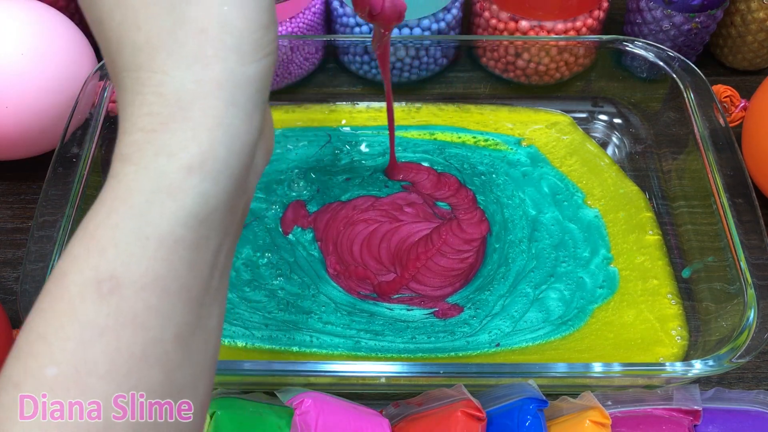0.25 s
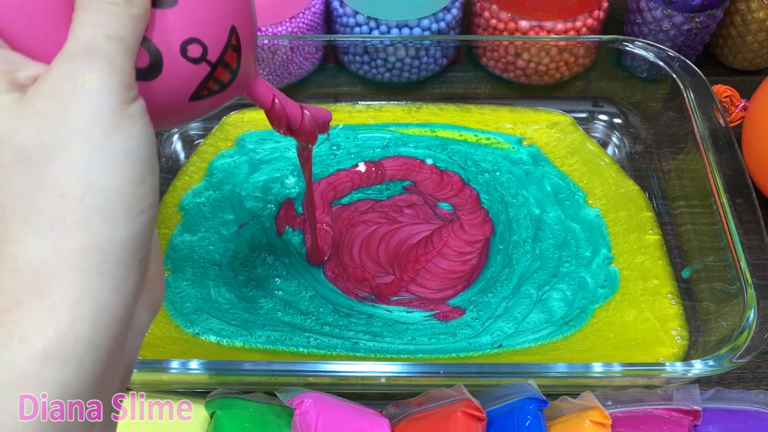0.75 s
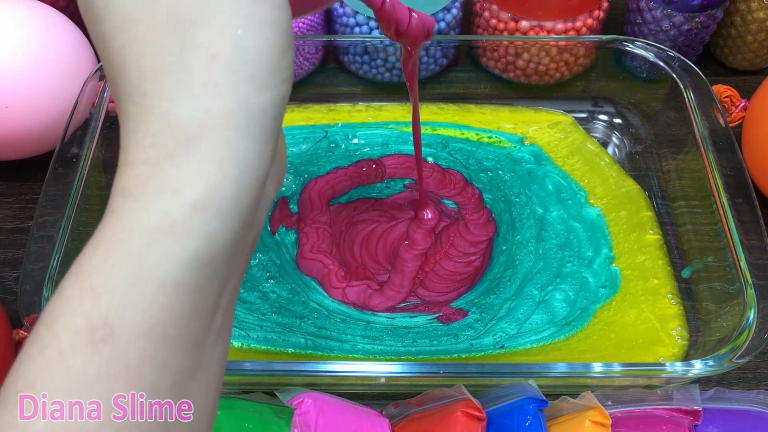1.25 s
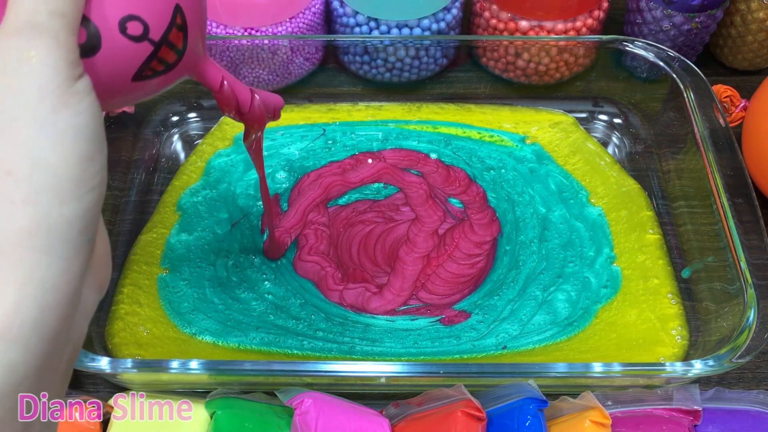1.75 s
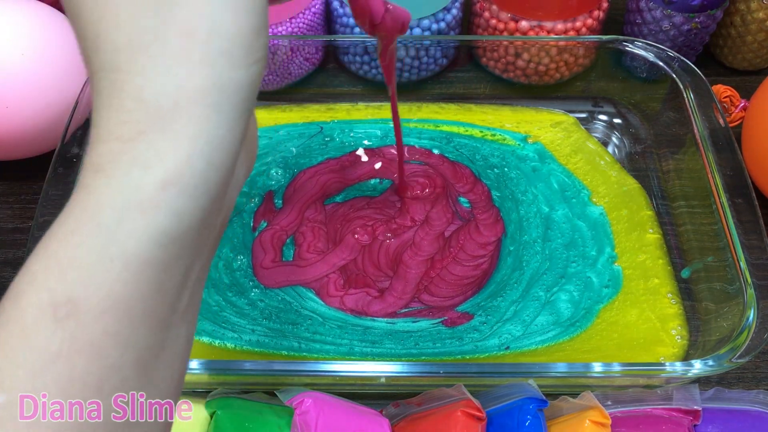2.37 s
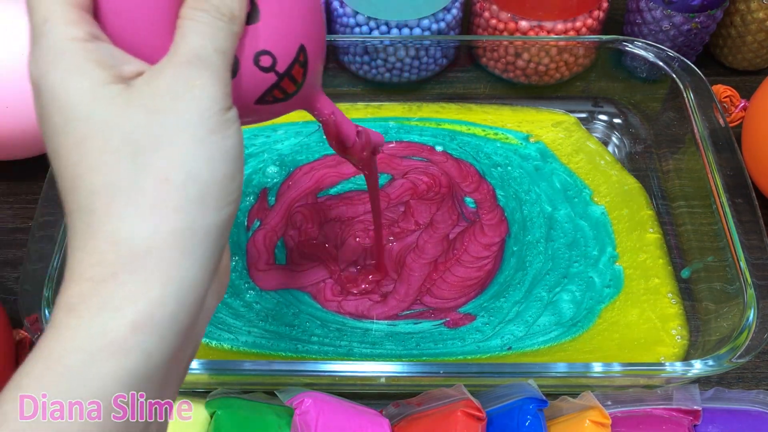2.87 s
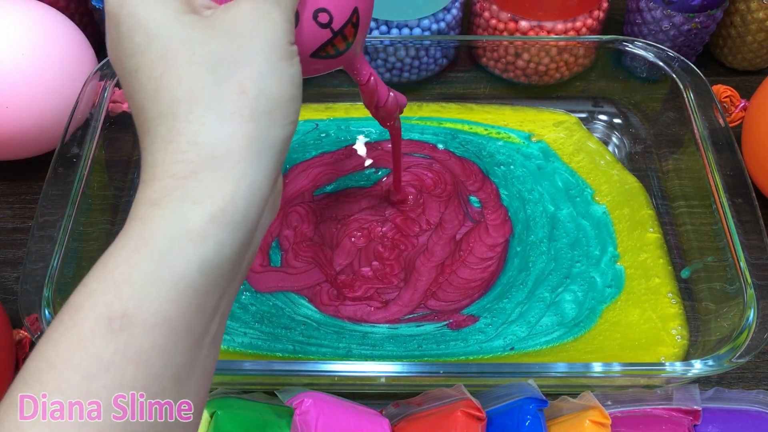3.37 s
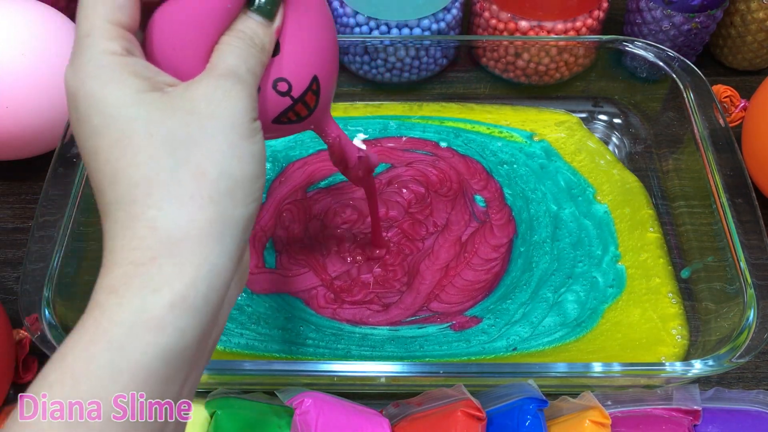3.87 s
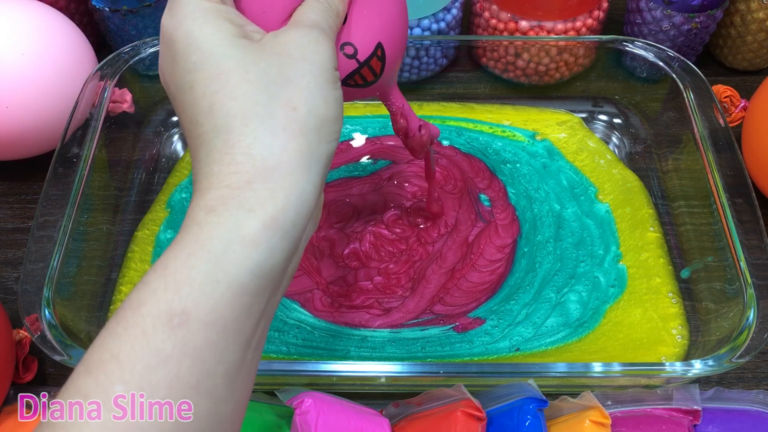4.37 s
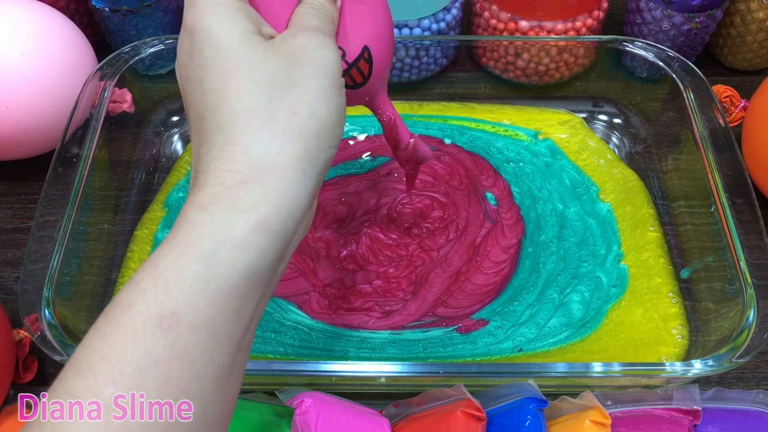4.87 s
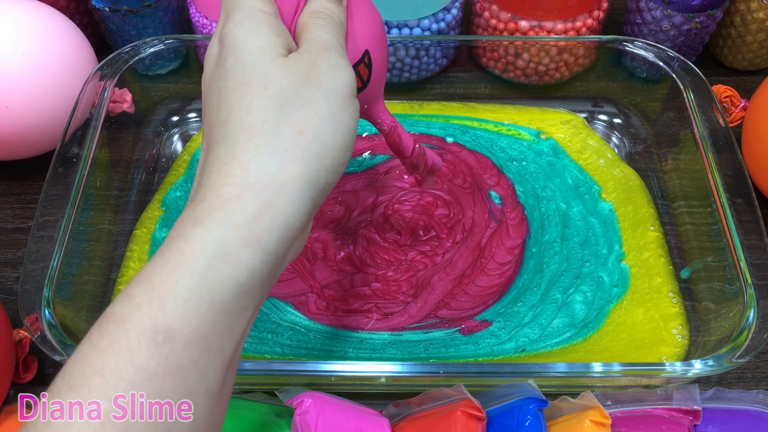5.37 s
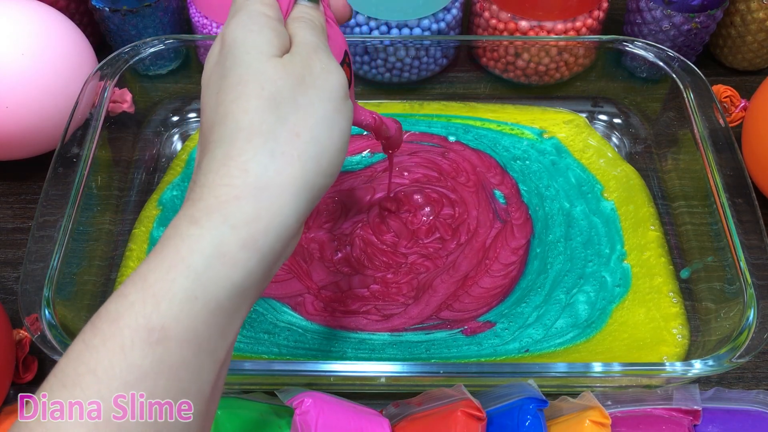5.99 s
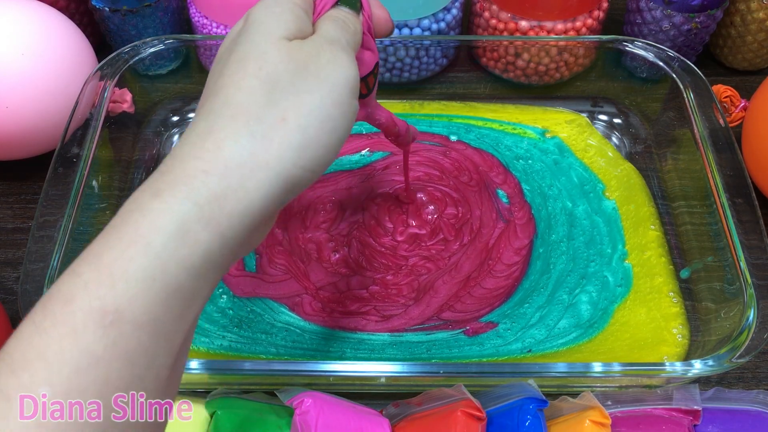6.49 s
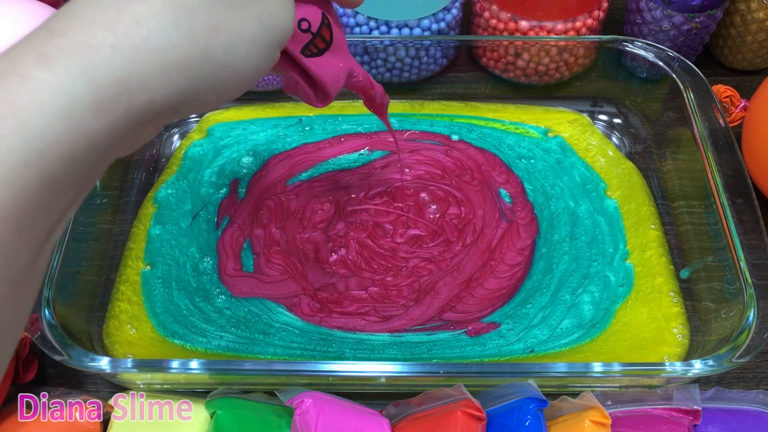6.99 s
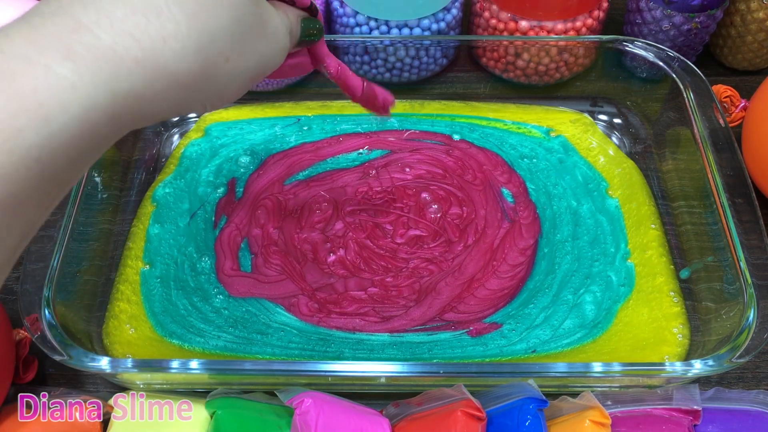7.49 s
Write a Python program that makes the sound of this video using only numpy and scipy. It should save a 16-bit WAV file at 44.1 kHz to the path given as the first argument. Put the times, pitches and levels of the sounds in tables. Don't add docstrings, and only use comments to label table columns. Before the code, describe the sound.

A nearly silent small room with very soft finger rubs on stretched rubber. A hard object clacks sharply at one second. Then air sputters through thick wet slime in a balloon neck: small ticking pops gather into a loud, fluttering, raspy squelch, pause, return in a second long splutter, and finish with a short burst of crackly dregs and stray faint ticks. Close microphone, bright and crisp, short room tail.

```python
import sys
import numpy as np
from scipy import signal
from scipy.fft import rfft, irfft
from scipy.io import wavfile

SR = 44100
rng = np.random.default_rng(int(sys.argv[2]) if len(sys.argv) > 2 else 0)


def rack_gain(trim_db):
    fader = np.asarray(trim_db, float)
    return 10 ** (fader / 20)


def waveform_to_disk(signal):
    frames = np.transpose(np.atleast_2d(signal))
    scaled = np.clip(frames, -1, 1) * 32767
    samples = np.round(scaled).astype(np.int16)
    wavfile.write(sys.argv[1], SR, samples)


N = 341268

# [f/Hz, level/dB per Hz]
AIR_SPECTRUM = [(15, -40), (25, -28), (43, 0), (92, -0.5), (172, -16), (422, -24), (584, -29.5),
                (766, -29.5), (1220, -34.5), (1880, -35.5), (15200, -42), (16500, -51.5)]
# [f/Hz, level/dB]
HUM_LINES = [(780.6, -81.5), (1943, -85.5)]
# [t/s, rise/dB]
RUMBLE_SWELLS = [(.17, 4), (2.952, 8), (3.85, 12.5), (5.3, 4), (5.95, 6), (6.5, 10.5), (6.699, 3), (7.0, 6),
                 (7.38, 4)]
AIR_DB, RUMBLE_DB, SWELL_S = -65, -64, 0.13

# [t/s, length/s, level/dB, slip colour f/Hz, share of the skin's ring]
FINGER_RUBS = [
    (.02, .004, -62, 2000, .2),
    (.143, .012, -66, 1900, .9),
    (.157, .006, -55, 2800, .9),
    (.17, .015, -60, 1000, .9),
    (.224, .01, -61, 2000, .9),
    (.24, .012, -61, 1000, .9),
    (.385, .018, -59, 1900, .9),
    (.791, .007, -49, 1650, .03),
]
# [f/Hz, width/Hz, level/dB]
SKIN_MODES = [(990, 130, 11), (1880, 115, 14.5), (2410, 88, 5.5), (2710, 100, 11), (3800, 200, -9)]

# [t/s, level/dB, hardness f/Hz]
CLACK_CONTACTS = [
    (1.0278, -36, 2400),
    (1.0312, -40, 5000),
    (1.0368, -30, 2800),
    (1.0411, -21, 16000),
    (1.0421, -14.5, 16000),
    (1.0469, -16.5, 10000),
    (1.0529, -19, 8500),
    (1.0578, -19, 8500),
]
# [f/Hz, level/dB, t60/s]
CLACK_RING = [(165, -27, .12), (230, -23, .05), (340, -27, .04), (800, -10, .008), (1600, -3, .006),
              (2400, -2, .009), (3300, -1, .007), (4500, 2, .007), (5900, -20, .11), (7700, -16, .02),
              (11600, -17, .07), (12100, -4, .006), (13100, -15, .06)]
# [low f/Hz, high f/Hz, level/dB, t60/s]
CLACK_BODY = [(148, 400, -42, 0.19), (2180, 3650, -32.5, 0.24), (3500, 3800, -50, .2),
              (9000, 13500, -35, 0.11)]
CLACK_DB = 6.5

# [t/s, time to the snap/ms, snap level/dB, plop level/dB]
FIRST_PUFFS = [(1.97, 1.1, -53, -61), (2.0023, 1.5, -42, -48), (2.0404, 0.75, -37.5, -42.5),
               (2.086, 1.8, -37, -47), (2.1053, .7, -37.5, -43), (2.1314, 7.5, -45, -40),
               (2.1663, 0.22, -35.5, -38), (2.1858, 0.29, -39, -41), (2.2251, 0.6, -35, -58),
               (2.2474, 0.51, -36.5, -39), (2.2627, 1.1, -32, -36.5), (2.2822, 0.79, -36, -49),
               (2.2986, 2.1, -35.5, -45), (2.3182, 0.8, -35.5, -29), (2.3495, 3, -33.5, -62),
               (2.3721, 0.27, -36, -50), (2.3915, 0.76, -32.5, -23.5), (2.4035, 3.2, -30.5, -30),
               (2.4381, 1, -32, -36), (2.4528, 0.62, -37, -35.5), (2.4625, 1.6, -27, -62),
               (2.5002, 0.51, -42, -40.5), (2.5183, 0.22, -33, -64), (2.5473, 0.87, -38.5, -53),
               (2.5787, 0.25, -36, -43), (2.6022, 0.22, -29.5, -26), (2.624, 7.8, -43.5, -62),
               (2.6385, 3.2, -28.5, -27), (3.166, 0.87, -55, -46), (3.1895, 0.77, -35.5, -69)]
SECOND_PUFFS = [(3.638, 2.1, -52, -78), (3.6538, 2.8, -35.5, -79), (4.1192, 0.48, -27.5, -38),
                (4.141, 3.3, -22, -32), (4.1696, 6, -30, -63), (4.1971, 0.26, -26.5, -36.5),
                (4.226, 1.8, -28, -59), (4.2472, 2.6, -29.5, -74), (4.2556, 1.5, -51.5, -36),
                (4.2771, 5.6, -27.5, -48), (4.3097, 4.7, -28.5, -30), (4.3392, 3.8, -26.5, -37),
                (4.3653, 5.1, -26.5, -29), (4.394, 2.9, -21, -29), (4.4218, 2.4, -22.5, -29),
                (4.445, 6.9, -25, -24), (4.455, 0.37, -22, -62), (4.4696, 8.6, -23, -27),
                (4.495, 4.7, -21.5, -26), (4.52, 7.4, -25, -28), (4.528, 2.5, -28, -55),
                (4.542, 0.79, -40, -50), (4.5521, 1.6, -23, -31), (4.5746, 3.1, -21, -26),
                (4.611, 8.2, -25, -27.5), (4.628, 7.7, -36, -40), (4.65, 2.45, -27, -30.5),
                (4.6856, 14.6, -36, -36), (4.7, 0.75, -23, -28.5), (4.7343, 10, -33, -43.5)]
DREGS_PUFFS = [(5.5872, 21.3, -43, -31.5), (5.609, 1.35, -20.5, -56), (5.6118, 2.3, -26.5, -57),
               (5.633, 3.6, -26.5, -32), (5.643, 6.5, -26, -50), (5.6773, 6.7, -32.5, -28),
               (5.6883, 13.6, -29.5, -49), (5.719, 7.2, -25.5, -60), (5.7298, .6, -35, -39),
               (5.746, 8.5, -31, -55), (5.757, 8.5, -33, -61), (5.797, 10, -42.5, -66),
               (5.835, 9, -30, -42.5), (5.906, 2.6, -34, -33), (5.9155, 3.9, -31.5, -32.5)]
LONE_PUFFS = [(2.02, 1.0, -49, -77), (3.152, 0.37, -40, -65), (4.789, 2.8, -47, -63),
              (4.795, 1.7, -32, -68), (4.856, 0.7, -29.5, -53), (4.9153, 2, -51, -37),
              (4.943, 1.1, -36, -41), (5.041, 1.44, -40, -48.5), (5.143, 7.1, -43, -41),
              (5.158, 5.6, -45.5, -72), (5.3, 4.7, -54.5, -51), (5.959, 5.2, -42, -72),
              (5.9743, 2.3, -38.5, -70), (6.017, 5.5, -34.5, -67), (6.0588, 1.9, -43.5, -67),
              (6.07, 1.6, -39.5, -48.5), (6.114, 3.36, -34, -50), (6.154, 8, -41.5, -51),
              (6.2025, 6.9, -43.5, -62), (6.26, 1.6, -42.5, -79), (6.5006, 9.3, -56, -50.5),
              (6.9057, 1.7, -52, -62), (6.9846, 1.1, -55.5, -60), (7.6326, .4, -50.5, -57.5),
              (7.6898, .6, -57, -59)]
FIRST_FLUTTER_PUFFS = [(2.65, 0.45, -29, -37), (2.6632, 0.53, -30.5, -36), (2.6764, 0.41, -22.5, -26),
                       (2.6908, 1.1, -27, -41.5), (2.6959, 0.33, -28, -19.5), (2.71, 4.7, -20, -24.5),
                       (2.7266, 1.1, -21, -20.5), (2.7387, 3.14, -18, -15), (2.7554, 1, -15.5, -23.5),
                       (2.767, 0.74, -24.5, -15.5), (2.7795, 1.05, -22.5, -22), (2.7907, 3.8, -23, -16),
                       (2.802, 5.8, -11, -24.5), (2.8138, 4.6, -18, -23.5), (2.8291, 5.7, -20, -18.5),
                       (2.8435, 5.6, -20, -24.5), (2.8577, 5.6, -18, -20.5), (2.8682, 8.9, -21, -26),
                       (2.887, 5.9, -25, -30), (2.8992, 6.3, -20.5, -34), (2.9135, 5, -18.5, -22.5),
                       (2.9286, 4.7, -20.5, -46), (2.942, 4.4, -20.0, -25.5), (2.956, 4.3, -19, -26.5),
                       (2.972, 0.7, -23, -23), (2.9838, 4.0, -17, -30.5), (3.0025, 8.9, -42, -34),
                       (3.0179, 6.6, -21, -30), (3.038, 2.92, -19.5, -29), (3.0605, 1.54, -20.5, -26),
                       (3.0779, 4.4, -24.5, -45), (3.1033, 4.2, -26, -33), (3.1228, 0.6, -28.5, -35),
                       (3.1267, 0.5, -40, -48), (3.1393, 0.66, -34, -48)]
SECOND_FLUTTER_PUFFS = [(3.6786, 0.53, -25, -25), (3.6932, 3.9, -31, -36), (3.708, 0.38, -29, -66),
                        (3.713, 0.64, -33.0, -23.5), (3.7296, 2, -23.5, -21.5), (3.7447, 0.3, -31, -24),
                        (3.761, 1.8, -25, -24), (3.7744, 3.2, -27.0, -20), (3.7902, 1.05, -20.5, -22),
                        (3.8057, 3, -16.5, -22.5), (3.8216, 6.1, -21.5, -27.0), (3.8377, 7.3, -17, -22),
                        (3.8529, 8.6, -23, -30), (3.87, 6.4, -21, -27), (3.8857, 7.6, -23, -32),
                        (3.9008, 7.2, -21.0, -30.5), (3.92, 5.6, -25.5, -32), (3.9338, 6.3, -23.5, -37),
                        (3.9542, 4, -23.0, -40), (3.971, 5.6, -22.0, -26.5), (3.9893, 5.9, -23.5, -32.5),
                        (4.0115, 0.64, -25.5, -31.5), (4.031, 5.7, -25.5, -32.5), (4.0502, 5.8, -30, -33),
                        (4.0731, 2.9, -26, -35), (4.0961, 1.7, -26.5, -33.5)]
FILM_SPITS = [(2.071, 1.26, -36.5, -48), (2.119, 1, -43, -54), (2.137, 1, -38, -60), (2.273, 1, -35.5, -39),
              (2.289, .6, -48, -35), (2.342, 0.77, -31, -45), (2.355, 0.46, -32, -54), (2.424, 1, -40, -42),
              (2.535, 1.2, -41, -40), (3.672, 3.3, -33, -70), (4.116, .4, -35, -60), (4.201, 2.1, -30, -63),
              (4.582, 3, -23.5, -51), (4.615, 1.1, -23.5, -33), (4.718, 4, -45, -70),
              (5.014, 5.6, -55, -51), (5.623, 8, -37, -68), (5.812, 6, -40, -75)]
NECK_CLOSING_MS = (3.1, 2.1, 3.5, 4.6, 2.0, 2.2, 2.2)
GAP_WHISTLE_HZ = [
    [3800, 4580, 12100, 7300, 6800, 6200, 4070, 14200, 13000, 6400, 15500, 11700, 11400, 5750, 6700, 7800,
     7300, 7700, 5600, 6840, 7500, 7500, 7500, 15600, 4200, 7600, 15400, 5920, 14600, 14500],
    [8000, 8200, 7300, 7800, 9300, 7000, 7300, 7300, 8100, 7500, 9600, 7550, 5260, 11800, 14800, 7200, 4400,
     7300, 7500, 8950, 6900, 15500, 7240, 14400, 7200, 9000, 7200, 11400, 6200, 6200],
    [4100, 6200, 7000, 15500, 7900, 15500, 7800, 12300, 7600, 7300, 6600, 7600, 11800, 5240, 6100],
    [7140, 6000, 15300, 15300, 7050, 6850, 6850, 6400, 4100, 9860, 5500, 7600, 7500, 7800, 9900, 7300, 7600,
     9900, 9700, 10600, 4200, 6800, 6850, 11300, 5400],
    [11340, 7310, 8200, 12300, 6700, 12600, 7370, 7300, 7550, 7500, 9300, 7500, 9000, 9200, 7380, 9100,
     9000, 7740, 9200, 7600, 7770, 9500, 9400, 8900, 7900, 9800, 7800, 7900, 8500, 15000, 12500, 15600,
     8500, 10600, 8300],
    [7800, 11700, 12700, 8100, 4455, 4400, 6400, 7000, 8500, 8000, 8000, 9670, 8720, 8370, 9100, 8320, 7350,
     9060, 7000, 8400, 6100, 8400, 8000, 6200, 14500, 7800],
    [7300, 6500, 6200, 7500, 11000, 9000, 7000, 9000, 11000, 10500, 9000, 8000, 7500, 7200, 15000, 7000,
     15300, 15000],
]
SEAL_TEAR_DB = (-35, -12, -17, -8.5, -7, -7, -18)
SHUT_PLOP_DB = (3, -8, 0.5, -5, 0.5, -8, -11)
BROAD_SHARE = (.6, 0.7, 0.49, 0.63, 0.61, 0.84, .45)
CLOSING_SPREAD = .45
# [t/s, plop f/Hz, air push level/dB against the snap]
WET_LIPS = [(2.0, 1065, -16), (2.7, 960, -10.5), (3.101, 892, -12.5), (3.65, 1067, -18), (3.9, 1030, -4.5),
            (4.05, 1195, -10.5), (4.64, 1510, -13.5), (4.694, 545, -0.5), (4.74, 664, -39), (4.9, 676, 3),
            (5.15, 1250, 0.5), (5.61, 540, -6.5), (5.68, 1490, -14), (5.9, 1530, -22)]
# [f/Hz, level/dB per Hz]
JET_SPECTRUM = [(880, -42.5), (1500, -7.5), (2150, -8), (3450, -6.5), (3780, -9.5), (4340, -7.5),
                (7540, -4.5), (13500, -8), (15100, -5.5), (16000, -10.5), (16500, -22.5)]
HISS_FROM_HZ, HISS_DULL = 5200, 0.56

# [t/s, level/dB]
FILM_FIZZ = [
    [(1.99, -97), (2.06, -58.5), (2.15, -58), (2.21, -55.5), (2.33, -56.5), (2.47, -66), (2.56, -68),
     (2.66, -54.5), (2.85, -40), (3.05, -55), (3.25, -86)],
    [(3.62, -84), (3.72, -52), (3.88, -49), (4.1, -56.5), (4.4, -56.5), (4.55, -49.5), (4.76, -64),
     (5.0, -76)],
    [(5.585, -75), (5.7, -50.5), (5.8, -70), (5.88, -62), (5.95, -78), (6.3, -83)],
]

# [start f/Hz, end f/Hz, level/dB, t60/s]
POCKET_MODES = [
    ((1.95, 3.3), [(1050, 930, -8, .012), (3310, 3700, -11, .11), (4050, 4650, -16, .1), (5150, 5950, -16.5, .1), (5600, 6550, -16, .09), (7380, 8400, -17, .05)]),
    ((3.6, 4.1), [(1050, 1000, -14, .008), (3370, 3560, -19, .06), (4430, 4800, -15, .1), (7900, 8700, -23, .03)]),
    ((3.78, 4.1), [(5750, 6250, -13, .06)]),
    ((4.1, 4.68), [(3350, 3270, -13, .055), (4830, 4790, -24, .04), (6600, 6800, -26, .03), (7700, 7500, -26, .025)]),
    ((4.68, 5.4), [(3270, 3180, -24, .04), (6100, 6300, -22, .03), (6800, 7000, -19, .04)]),
    ((5.55, 6.35), [(6200, 6300, -23, .02), (7800, 7500, -20, .015)]),
]
POCKET_BENDS = (3, 1.6, 1.3, 1, 1, 1)
POCKET_RISES = (3, -4.5, -0.2, 9, 1, -3.5)

ROOM_T60_S, ROOM_TOP_T60_S, ROOM_DB, WALL_CUT_HZ = 0.14, 0.23, -13.5, 5400


def rms_one(x):
    return x / np.sqrt(np.mean(x ** 2) + 1e-20)


def butter(x, order, hz, kind):
    return signal.sosfilt(signal.butter(order, hz, kind, fs=SR, output="sos"), x)


def band(x, low_hz, high_hz, order=2):
    return butter(x, order, [low_hz, min(high_hz, .45 * SR)], "band")


def coloured(x, spectrum):
    hz, level_db = np.transpose(spectrum)
    grid = np.maximum(np.fft.rfftfreq(4096, 1 / SR), 1)
    cepstrum = irfft(np.log(rack_gain(np.interp(np.log(grid), np.log(hz), level_db))))
    cepstrum[1:2048] *= 2
    cepstrum[2049:] = 0
    response = irfft(np.exp(rfft(cepstrum)))
    return signal.fftconvolve(x, rms_one(response) / 64)[:N]


def resonance(x, hz, width_hz):
    r = np.exp(-np.pi * width_hz / SR)
    poles = [1, -2 * r * np.cos(2 * np.pi * hz / SR), r * r]
    return signal.lfilter(np.array([1, 0, -1]) * (1 - r * r) / 2, poles, x)


def gliding_ring(x, hz, t60):
    turn = np.exp(2j * np.pi * np.cumsum(hz) / SR)
    r = rack_gain(-60 / (t60 * SR))
    return np.real(turn * signal.lfilter([np.sqrt(2 - 2 * r * r)], [1, -r], x / turn))


def add(track, s, sound):
    i = int(s * SR)
    track[i:i + len(sound)] += sound[:N - i]


def background():
    t = np.arange(N) / SR
    air = butter(coloured(rng.standard_normal(N), AIR_SPECTRUM), 2, 170, "high")
    rumble = rms_one(band(coloured(rng.standard_normal(N), AIR_SPECTRUM), 57, 150, order=3))
    swell_db = sum(db * np.exp(-((t - s) / SWELL_S) ** 2) for s, db in RUMBLE_SWELLS)
    hum = sum(rack_gain(db - 1.5) * np.sin(2 * np.pi * hz * t) for hz, db in HUM_LINES)
    return rack_gain(AIR_DB) * rms_one(air) + rack_gain(RUMBLE_DB + swell_db) * rumble + hum


def rubs():
    t, out = np.arange(4000) / SR, np.zeros(N)
    for s, length, level_db, hz, share in FINGER_RUBS:
        swell = np.exp(-2 * ((t - .02) / length) ** 2)
        crackle = rack_gain(2.0 * np.minimum(rng.exponential(1, len(t)), 4))
        slips = swell * rng.standard_normal(len(t)) * crackle
        skin = sum(rack_gain(db) * resonance(slips, mode_hz, width) for mode_hz, width, db in SKIN_MODES)
        own_colour = resonance(resonance(slips, hz, 1000), hz, 1000)
        add(out, s - .02, rack_gain(level_db) * (2.5 * share * skin + 1.7 * own_colour + .04 * share * slips))
    return out


def clack():
    out, t = np.zeros(N), np.arange(6000) / SR
    for s, level_db, hard_hz in CLACK_CONTACTS:
        ring = np.zeros(len(t))
        for hz, db, t60 in CLACK_RING:
            own_db = rng.normal(0, 2.5)
            ring += rack_gain(db + own_db) * np.sin(2 * np.pi * hz * t) * rack_gain(-60 * t / t60)
        contact = band(rng.standard_normal(len(t)) * np.exp(-t * 600), 1500, 5500)
        crack = (.22 * ring + .6 * contact) * np.minimum(t / .0004, 1)
        add(out, s, rack_gain(CLACK_DB + level_db) * butter(crack, 2, hard_hz, "low"))
    t = np.arange(SR // 2) / SR
    for low_hz, high_hz, level_db, t60 in CLACK_BODY:
        rustle = rms_one(band(rng.standard_normal(len(t)), low_hz, high_hz))
        add(out, CLACK_CONTACTS[4][0], rack_gain(level_db - 60 * t / t60) * np.minimum(t / 0.0076, 1) * rustle)
    return out


def all_puffs():
    rows = []
    groups = [FIRST_PUFFS, SECOND_PUFFS, DREGS_PUFFS, LONE_PUFFS,
              FIRST_FLUTTER_PUFFS, SECOND_FLUTTER_PUFFS, FILM_SPITS]
    for group, closing_ms, hz, *habits in zip(groups, NECK_CLOSING_MS, GAP_WHISTLE_HZ,
                                              SEAL_TEAR_DB, SHUT_PLOP_DB, BROAD_SHARE):
        s, snap_ms, snap_db, plop_db = np.transpose(group)
        chance = rng.standard_normal(len(s)).clip(-2, 2)
        open_ms = snap_ms + closing_ms * np.exp(CLOSING_SPREAD * chance)
        habit_columns = [np.full(len(s), h) for h in habits]
        rows.append(np.transpose([s, snap_ms, open_ms, snap_db, plop_db, hz] + habit_columns))
    return np.vstack(rows)


def puff_of_air(ms, snap_ms, open_ms, seal, late):
    white = rng.standard_normal(len(ms)).clip(-2, 2)
    tick = 1.6 * seal * np.exp(-ms / 0.12)
    flutter = rack_gain(1.8 * np.sin(2 * np.pi * (ms / 3.1 + late)))
    opening = np.clip(2 * seal + ms / snap_ms, 0, 1)
    shutting = np.exp(-np.maximum(ms - snap_ms, 0) / max(0.87 * (open_ms - snap_ms), .6))
    held = rack_gain(-10.0) * flutter * opening * shutting
    snap = np.exp(-np.abs(ms - snap_ms) / np.where(ms < snap_ms, .5, .7))
    drain = rack_gain(-29.0) * np.exp(-ms / 14) * np.minimum(ms / snap_ms, 1)
    puff = white * (np.maximum(np.maximum(tick, held), snap) + drain)
    return 2.28 * puff / np.abs(puff).max()


def lip_plop(ms, lips_hz, late):
    pitch_hz = lips_hz * (.9 + .2 * late) * (1 + .9 * np.exp(-ms / 1.0))
    plop = np.sin(2 * np.pi * np.cumsum(pitch_hz) / SR) * np.exp(-ms / 1.3) * np.minimum(ms / 0.21, 1)
    end_hz = pitch_hz[-1]
    return band(plop, .75 * end_hz, 5 * end_hz), end_hz


def neck():
    jet, plops, ms = np.zeros(N), np.zeros(N), np.arange(2400) / SR * 1000
    lips_s, lips_hz, push_db = np.transpose(WET_LIPS)
    for s, snap_ms, open_ms, snap_db, plop_db, hz, tear_db, shut_db, broad in all_puffs():
        late = rng.random()
        snap_ms = max(snap_ms, .3)
        seal = rack_gain(np.clip(plop_db - snap_db + 13.5, tear_db, -2))
        puff = puff_of_air(ms, snap_ms, open_ms, seal, late)
        bright = butter(puff, 3, HISS_FROM_HZ, "high")
        hiss = puff + (1 - HISS_DULL) * np.minimum(ms / 1.8, 1) * (bright - puff)
        whistle = 1.2 * resonance(puff, min(hz, .4 * SR), 900) + 0.32 * resonance(puff, 15000, 1100)
        add(jet, s, rack_gain(snap_db) * (broad * hiss + whistle))

        plop, end_hz = lip_plop(ms, np.interp(s, lips_s, lips_hz), late)
        closing = rack_gain(shut_db + 8 * late - 5) * min(snap_ms / 5, 1) ** 2
        dull_hiss = band(puff, .75 * end_hz, 1.8 * end_hz, order=3)
        add(plops, s, rack_gain(plop_db + 1.5) * (plop / (1 + closing) + dull_hiss))
        add(plops, s + snap_ms / 1000, rack_gain(plop_db + 0.5) * closing * plop)

        push = np.sin(2 * np.pi * 290 * ms / 1000) * np.exp(-ms / 0.94)
        add(plops, s + late * snap_ms / 1000, rack_gain(snap_db + np.interp(s, lips_s, push_db)) * push)
    return coloured(jet, JET_SPECTRUM), butter(plops, 2, 130, "high")


def pocket(jet):
    out = np.zeros(N)
    for ((start, end), modes), bend, rise_db in zip(POCKET_MODES, POCKET_BENDS, POCKET_RISES):
        part = jet[int(start * SR):int(end * SR)]
        emptied = np.linspace(0, 1, len(part)) ** bend
        driven = part * rack_gain(rise_db * (2 * emptied - 1).clip(-1, 0))
        for start_hz, end_hz, level_db, t60 in modes:
            hz = start_hz + (end_hz - start_hz) * emptied
            add(out, start, rack_gain(level_db) * gliding_ring(driven, hz, t60))
    return out


def fizz():
    t, level_db = np.arange(N) / SR, np.full(N, -120.)
    for curve in FILM_FIZZ:
        s, db = np.transpose(curve)
        on = (t >= s[0]) & (t <= s[-1])
        level_db[on] = np.interp(t[on], s, db)
    sizes = rack_gain(4.5 * np.minimum(rng.exponential(1, N), 4))
    clumps = np.repeat(rng.exponential(1, N // 128 + 1), 128)[:N]
    bursts = rng.random(N) < 4000 * clumps / SR
    grains = sizes * rng.standard_normal(N) * bursts
    bright = rms_one(coloured(grains + .45 * rng.standard_normal(N), JET_SPECTRUM))
    dull = rms_one(band(grains, 410, 2100))
    return rack_gain(level_db) * (bright + rack_gain(-3.5) * dull)


def room(x):
    t = np.arange(SR // 2) / SR
    cloud = rng.standard_normal(len(t)) * np.minimum(t / 0.015, 1)
    low = band(cloud, 250, WALL_CUT_HZ)
    top = cloud - low
    tail = low * rack_gain(-60 * t / ROOM_T60_S) + 0.66 * top * rack_gain(-60 * t / ROOM_TOP_T60_S)
    return signal.fftconvolve(x, tail / np.linalg.norm(tail))[:N]


def scene():
    quiet_room = background()
    rubbing = rubs()
    knock = clack()
    jet, plops = neck()
    escaping = jet + fizz()
    near = escaping + pocket(escaping + 0.21 * plops) + plops + rubbing
    reflections = rack_gain(ROOM_DB) * room(near + rack_gain(1.5) * knock)
    return (near + knock + reflections + quiet_room)[None]


def roll_off(x):
    return signal.sosfilt(signal.butter(12, 16990, fs=SR, output="sos"), x)


def record(dry):
    mix = signal.sosfilt(signal.cheby2(10, 40, 16600, fs=SR, output="sos"), dry)
    return roll_off(mix)


dry = scene()
out = record(dry)
waveform_to_disk(out)
```